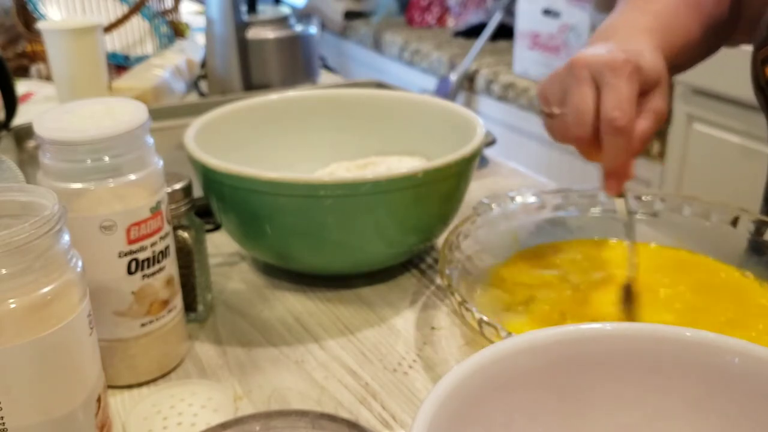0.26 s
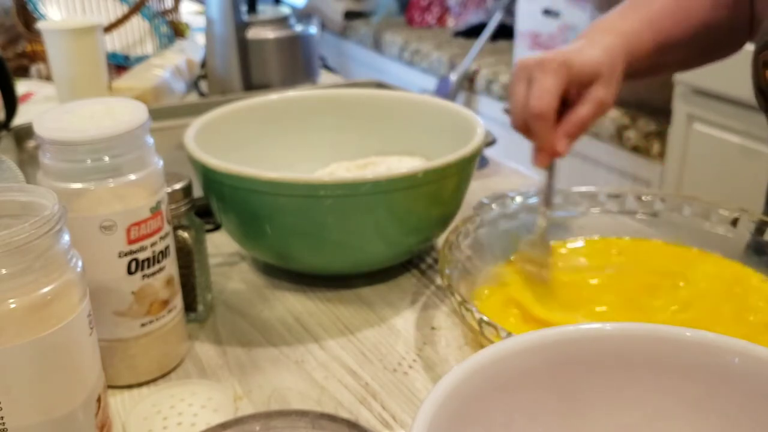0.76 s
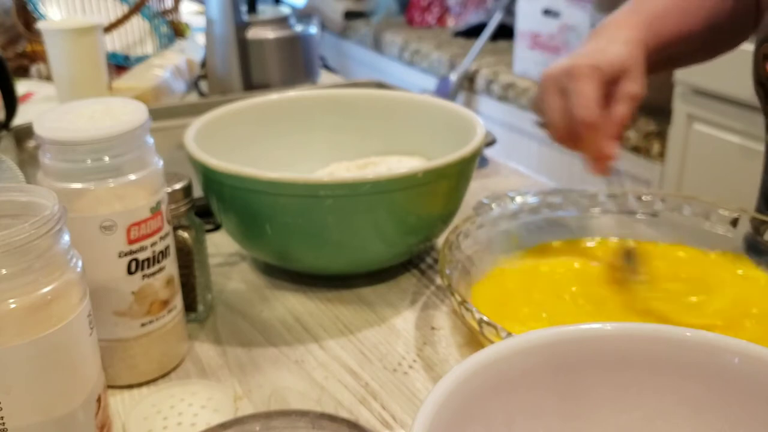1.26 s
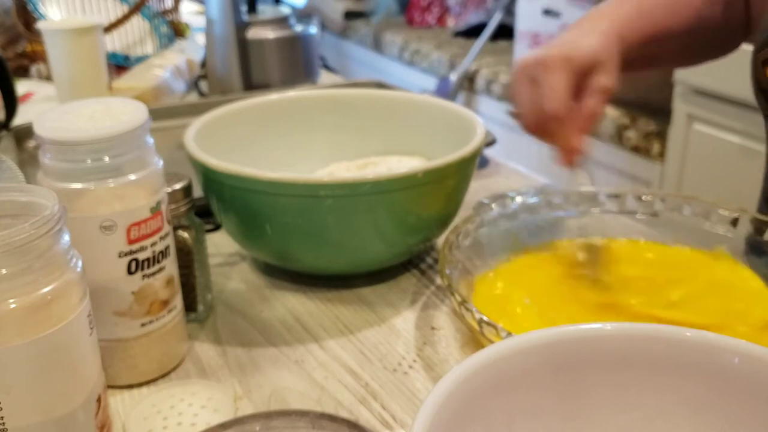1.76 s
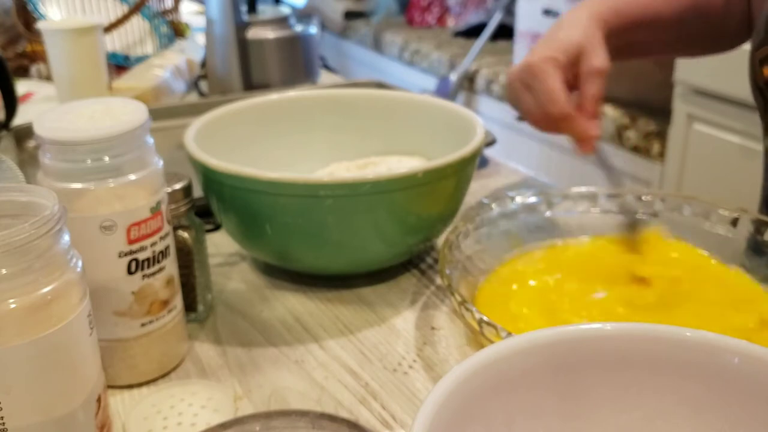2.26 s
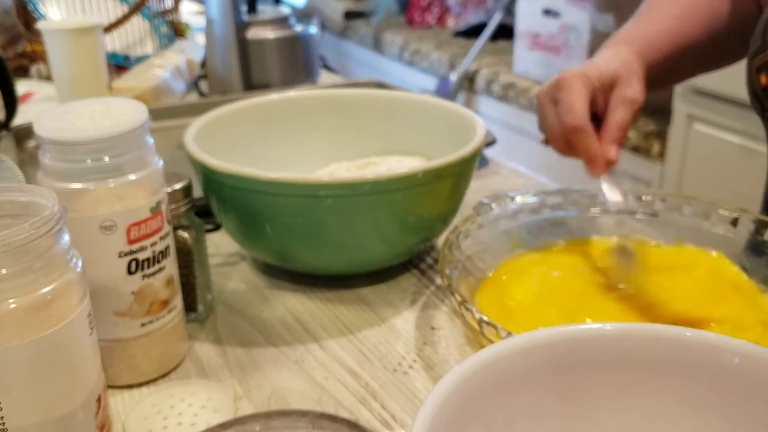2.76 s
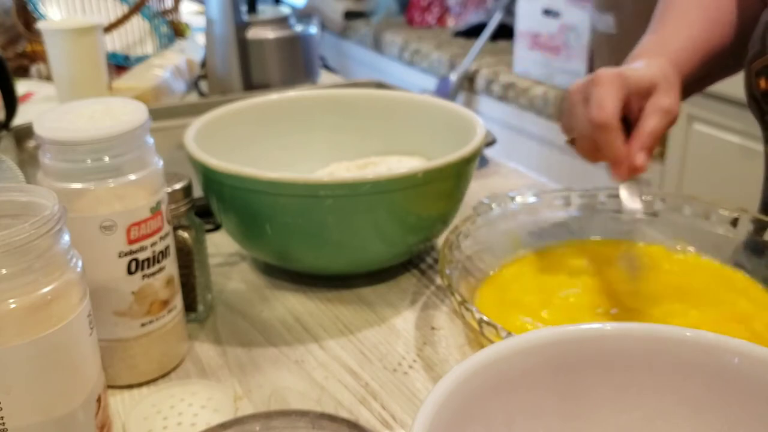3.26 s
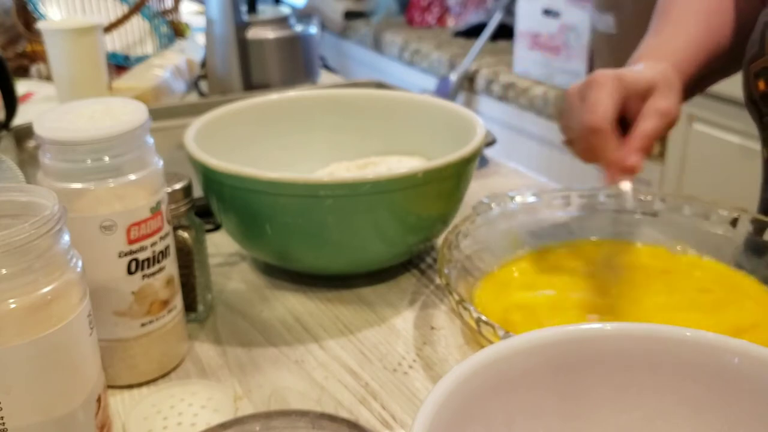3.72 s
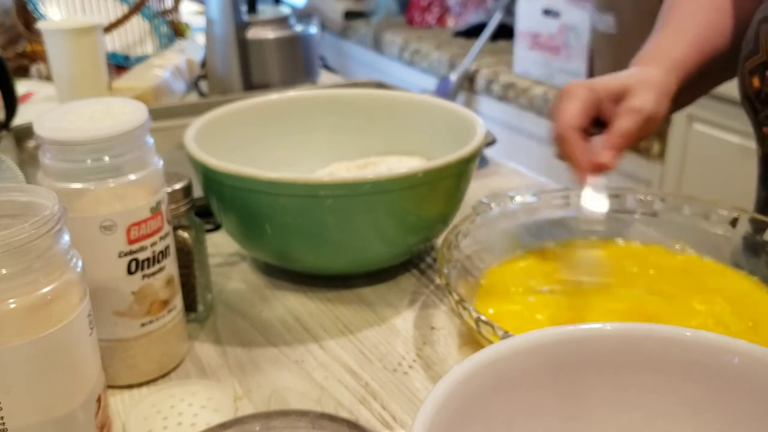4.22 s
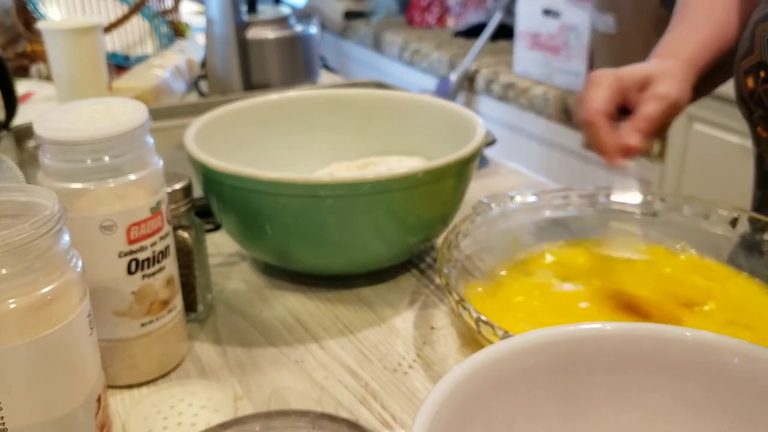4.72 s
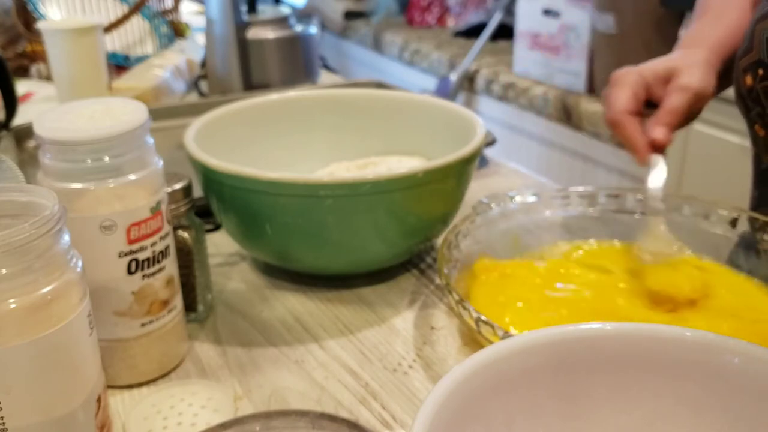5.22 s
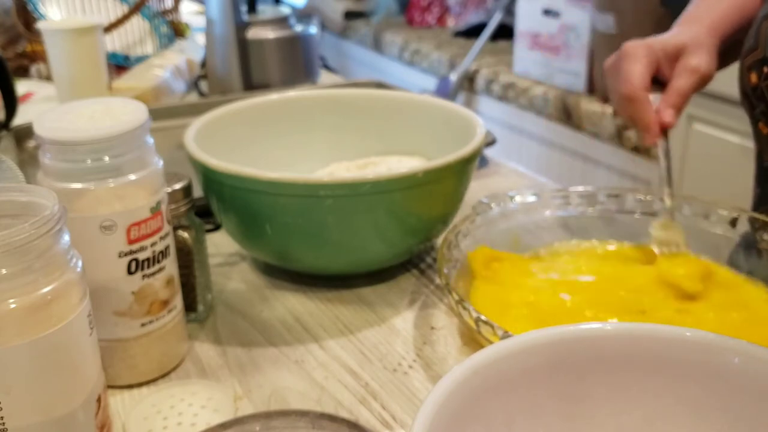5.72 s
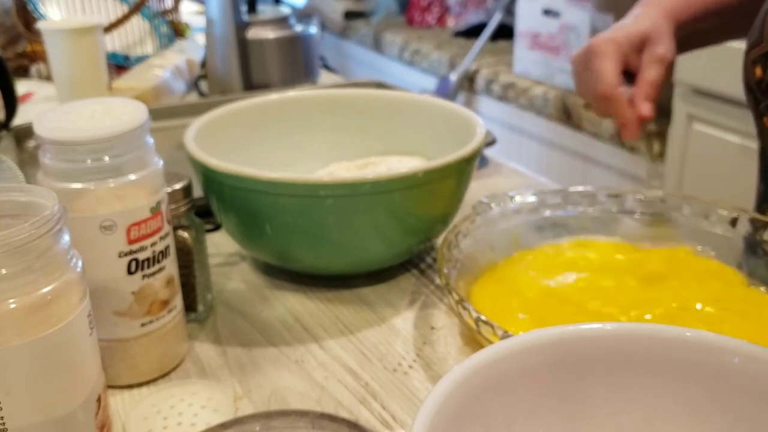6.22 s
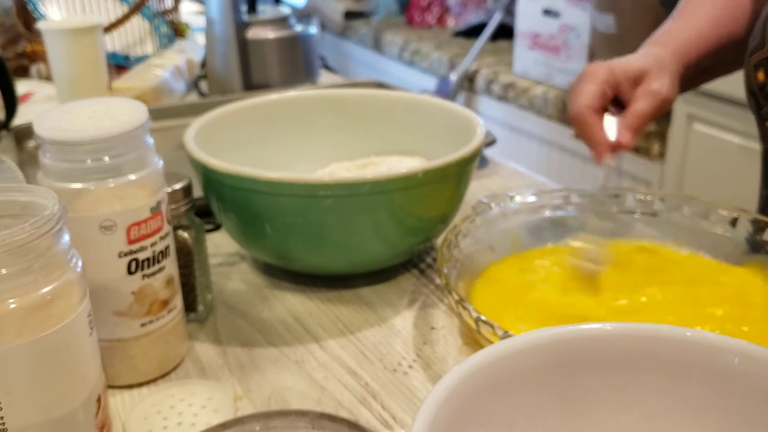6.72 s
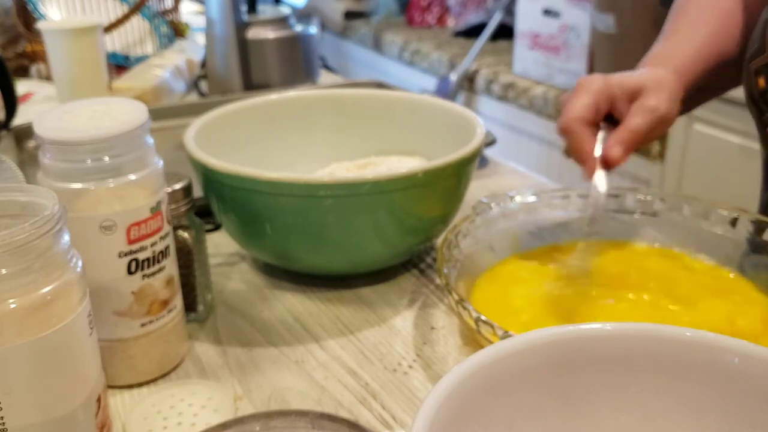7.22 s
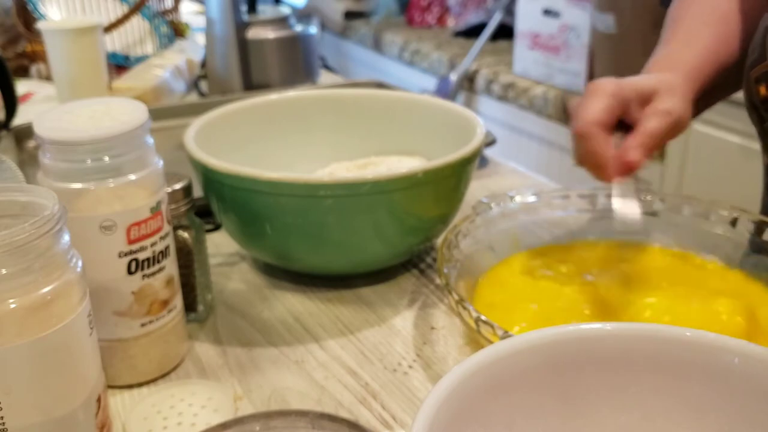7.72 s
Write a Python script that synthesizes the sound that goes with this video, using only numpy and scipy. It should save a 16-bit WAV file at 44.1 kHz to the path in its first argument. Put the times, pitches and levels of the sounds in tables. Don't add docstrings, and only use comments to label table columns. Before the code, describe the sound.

In a home kitchen, egg is stirred softly, then whisked briskly, fork tines clicking on glass amid slops and ringing rim knocks.

```python
import sys
import numpy as np
from scipy import signal
from scipy.fft import rfft, irfft, next_fast_len
from scipy.io import wavfile
from scipy.ndimage import uniform_filter1d, map_coordinates

SR = 44100
rng = np.random.default_rng(int(sys.argv[2]) if len(sys.argv) > 2 else 0)


def gain_from_decibels(decibels):
    exponent = np.asarray(decibels, float) / 20
    return 10 ** exponent


def unload_audio(sound):
    columns = np.transpose(np.atleast_2d(sound))
    steps = np.round(np.clip(columns, -1, 1) * 32767)
    wavfile.write(sys.argv[1], SR, steps.astype(np.int16))


N = 351918


def unit(x):
    return x / np.sqrt(np.mean(x ** 2) + 1e-20)


def along(points, hz):
    f, v = np.transpose(points)
    return np.interp(np.log(hz + 1), np.log(f + 1), v)


def filtered(x, response):
    m = next_fast_len(N + SR // 2)
    spectrum = rfft(x, m) * response(np.fft.rfftfreq(m, 1 / SR))
    return irfft(spectrum, m)[..., :N]


def body(modes):
    def response(f):
        total = 0
        for k, (centre, width, db) in enumerate(modes):
            resonance = 1j * f * width / (centre * centre - f * f + 1j * f * width)
            total = total + (-1) ** k * gain_from_decibels(db) * resonance
        return total
    return response


def add(track, s, sound):
    part = track[..., max(round(s * SR), 0):][..., :sound.shape[-1]]
    part += sound[..., :part.shape[-1]]


def wobble(rate_hz):
    knots = rng.standard_normal(int(N * rate_hz / SR) + 4)
    return map_coordinates(knots, [np.arange(N) * rate_hz / SR])


def grit(count, spiky):
    size = np.exp(spiky * uniform_filter1d(rng.standard_normal(count), size=9))
    return unit(rng.standard_normal(count) * size)


def chatter(force, spiky):
    burst = force * grit(len(force), spiky)
    return burst * np.linalg.norm(force) / np.linalg.norm(burst)


def patchy(x, patchy_db):
    z = signal.stft(x, nperseg=512)[2]
    field = uniform_filter1d(rng.standard_normal(z.shape), size=7, axis=0)
    field = uniform_filter1d(field, size=6, axis=1)
    return signal.istft(z * gain_from_decibels(patchy_db * unit(field)), nperseg=512)[1][:N]


# t/s, click level/dB, sparkle over click/dB, spot f/Hz
BEATS = [(2.642, -30.5, 0.5, 7280), (2.821, -27.5, -3.5, 2025), (2.9886, -23.5, -1.5, 2130),
         (3.1597, -24.5, 1.5, 1267), (3.3228, -21, -3.5, 2306), (3.4901, -22, 0.5, 4800),
         (3.6531, -22.5, 1, 3350), (3.8172, -30, -3, 2890), (3.9876, -25, -2.5, 3030),
         (4.158, -25.5, -3.5, 2110), (4.3332, -33.5, -3.5, 7730), (4.5114, -37, -1.5, 2690),
         (4.678, -24, 0, 1983), (4.8466, -28, 0, 1859), (5.017, -16.5, 0.5, 2153), (5.5442, -29, -4, 2180),
         (5.7112, -28.5, -5, 2446), (5.896, -35.5, 2, 2110), (6.068, -29.5, -6.5, 2050),
         (6.256, -29.5, -3.5, 1970), (6.4202, -31.5, 0.5, 2100), (6.6055, -32.5, -1.5, 2340),
         (6.79, -28, 0, 7440), (6.9632, -28, -0.5, 3440), (7.1334, -26, -2.5, 2844),
         (7.314, -29, -2.5, 2100), (7.483, -21.5, -1, 2165), (7.659, -15.5, -5.5, 2910),
         (7.83, -20, 0, 1920)]
BEAT_THUD_DB = [-13, -13, -13.5, -11.5, -14, -13, -11, -8.5, -10, -11.5, -12.5, -10, -10.5, -9, -11.5,
                -17.5, -15, -5.5, -15, -10.5, -12, -14.5, -12.5, -13, -12.5, -12, -13, -15, -10]
BOUNCE_DB = [0, -9.5, -16.5, -10, -6, -21, -13, -1, -13, -10, -24, -19, -7, -13, -11, -13, -18, -25.5, -16,
             -13.5, -16, -7, -6.5, -8.5, -9, -9, -15.5, -20, -19]
# t/s, click level/dB, thud level/dB, sparkle level/dB, spot f/Hz
STIRS = [(0.4253, -38, -44, -38, 4700), (0.5695, -55, -53.5, -46, 5640), (0.631, -52, -63, -49, 5530),
         (0.7917, -37, -44.5, -31.5, 2160), (0.852, -44, -62, -47, 2994), (1.3174, -40.5, -79, -77, 2950),
         (1.4035, -46.5, -61, -51.5, 1095), (1.5492, -68, -77.5, -58, 6140), (1.6304, -44, -80, -62, 1034),
         (1.6863, -51, -73, -66, 5850), (1.7872, -53, -70, -42, 6200), (1.8459, -44, -62, -53, 1980),
         (2.0031, -51, -53, -38.5, 6640), (2.0144, -35, -47, -36, 2100), (2.0725, -50, -58.5, -48, 6160),
         (2.14, -52, -77, -71, 2120), (2.2197, -37, -47, -33, 6280), (2.4354, -34, -45.5, -30.5, 2080)]
GRAZE_S = [2.8022, 3.079, 3.562, 3.6274, 3.8055, 4.3008, 4.3728, 4.456, 4.4878, 4.668, 4.8331, 4.8871, 5.01,
           5.163, 5.886, 6.058, 6.247, 6.395, 6.595, 6.717, 6.783, 6.9412, 7.299, 7.3075]
# click level/dB, thud level/dB, spot f/Hz
GRAZES = [(-47, -53, 6800), (-41, -72, 1500), (-37, -45, 4280), (-37.5, -43, 1200), (-35, -46, 1307),
          (-37, -68, 20000), (-42, -57, 2700), (-55, -72, 1180), (-41.5, -62, 1160), (-42.5, -56, 2100),
          (-38.5, -47.5, 1020), (-41, -69.5, 8000), (-35.5, -48.5, 4100), (-50, -70.5, 4500),
          (-48.5, -75, 1330), (-47, -73, 980), (-41, -74, 850), (-53, -69, 1360), (-36.5, -66, 1360),
          (-50.5, -81, 3570), (-39, -44.5, 1360), (-39, -60, 1377), (-53.5, -60, 1300), (-37, -41, 1700)]


def contacts():
    graze_sparkle_db = -9
    contact_ms, contact_scatter = 2.88, 0.31
    bounce_ms, bounce_scatter = 8, 0.3
    rows = []
    for (s, db, bright_db, hz), thud_db in zip(BEATS, BEAT_THUD_DB):
        rows.append((s, db, db + thud_db, db + bright_db, hz))
    rows += STIRS
    for s, (db, thud_db, hz) in zip(GRAZE_S, GRAZES):
        rows.append((s, db, thud_db, db + graze_sparkle_db, hz))
    draws = rng.standard_normal((len(rows), 4))
    late = []
    for (s, *levels, hz), (_, when, _, pitch), late_db in zip(rows, draws, BOUNCE_DB):
        late_s = s + bounce_ms / 1000 * np.exp(bounce_scatter * when)
        late.append((late_s, *(np.array(levels) + late_db), hz * np.exp(0.15 * pitch)))
    lengths_ms = contact_ms * np.exp(contact_scatter * np.tile(draws[:, 0], 2))
    return [(*row, ms) for row, ms in zip(rows + late, lengths_ms)]


def landings():
    glass, steel, push, spot = np.zeros((4, N))
    lead_s, thud_leads_s = 0.02, 0.00297
    spot_t60_s, spot_sag_per_s = 0.019, 3.7
    t = np.arange(SR // 14) / SR - lead_s
    after = np.abs(t) * (t >= 0)
    skid = gain_from_decibels(-5.5) * np.exp(np.minimum(t, 0) / 0.0033) * (t < 0)
    for s, click_db, thud_db, sparkle_db, spot_hz, ms in contacts():
        press = np.exp(-(after / (max(ms, 0.3) / 1000)) ** 4)
        linger = gain_from_decibels(-9.0) * np.exp(-after / 0.019)
        force = skid + (t >= 0) * (press + linger)
        add(glass, s - lead_s, gain_from_decibels(click_db + 2.5) * chatter(force, spiky=1.42))
        add(steel, s - lead_s, gain_from_decibels(sparkle_db + 12.5) * chatter(force ** 1.46, spiky=2.66))
        fade = gain_from_decibels(click_db + 2.5 - 60 * after / spot_t60_s) * (1 - np.exp(-after / 0.00052))
        tone = np.sin(2 * np.pi * spot_hz * after * (1 - spot_sag_per_s * after))
        add(spot, s - lead_s, fade * tone)
        add(push, s - thud_leads_s, gain_from_decibels(thud_db + 19.5) * np.hanning(SR // 900))
    return glass, steel, push, spot


# middle t/s, length/ms, steel level/dB, squeal f/Hz
SLIDES = [(0.5, 66, -56, 6030), (0.574, 65, -47, 5860), (0.899, 85, -48.5, 6160), (1.149, 78, -50, 5900),
          (1.329, 47, -55.5, 6940), (1.40, 84, -49.5, 6250), (1.56, 33, -58, 6200),
          (1.644, 76, -51.5, 5820), (1.69, 37, -53.5, 6050), (1.799, 91, -56, 6900),
          (1.874, 53, -43.5, 6500), (2.007, 21, -47.5, 6800), (2.076, 64.6, -52, 6200),
          (2.432, 21, -40, 7540), (3.479, 10, -43, 7300), (3.561, 45, -45.5, 4300), (4.195, 29, -44, 6100),
          (5.353, 4.8, -24, 6900), (7.822, 14, -40, 6100)]


def slides():
    slide, squeal, glass = np.zeros((3, N))
    run_in_s, run_in_ms, run_in_db = 0.017, 32, -37.5
    squeal_db, squeal_width_hz, glass_db = 1.5, 250, -5.5
    run_ins = [(s - run_in_s, run_in_ms, db + run_in_db, hz) for s, db, _, hz in BEATS]
    for s, ms, steel_db, hz in SLIDES + run_ins:
        swell = np.hanning(round(1.3 * max(ms, 5) * SR / 1000))
        count = len(swell)
        start = s - count / SR / 2
        add(slide, start, gain_from_decibels(steel_db + 6.5) * swell * grit(count, spiky=0.73))
        smooth = max(round(SR / squeal_width_hz), 2)
        waver = unit(uniform_filter1d(rng.standard_normal(count), smooth))
        tone = waver * np.sin(2 * np.pi * hz * np.arange(count) / SR)
        add(squeal, start, gain_from_decibels(steel_db + squeal_db - 6.5) * swell * tone)
        add(glass, start, gain_from_decibels(steel_db + glass_db + 9.5) * swell * grit(count, spiky=0.295))
    return slide, squeal, glass


# f/Hz, width/Hz, level/dB
BOTTOM = [(834, 25, -6), (939, 52, -6.5), (1269, 190, -1), (1970, 160, 0.5), (2192, 292, 1.5),
          (2844, 384, 0.5), (3350, 560, -5), (4880, 800, -1.5), (5590, 960, -1), (6930, 510, -10)]
TINES = [(6470, 3700, -11.5), (11000, 1500, -2.5), (12170, 430, 2), (13800, 1240, -6.5)]
SLIDING = [(4320, 2000, -8.5), (6250, 310, -7.5), (7300, 410, -4.5), (10560, 420, 0), (11800, 830, -1),
           (13800, 1800, -5)]
LOW_SONG = [(1187, 24, 0), (1224, 14.6, 7)]
HIGH_SONG = [(2038, 14.7, -3), (2130, 59, -3)]
COUNTER = [(86.5, 8.8, -2.5), (136, 37, -9.5), (199.2, 19.5, 0), (266.1, 21, 2.5), (363, 110, -7.5),
           (420, 23.7, 1.5), (628, 96, -14)]
MIDDLE = [(110.7, 26, -0.5), (174.8, 15.8, 7), (208.5, 14, 8), (304.6, 29, -2.5), (382.6, 47.5, -2.5)]
DEEP = [(63.6, 12, -12), (85, 53, -4.5), (117.6, 5.1, 0)]
# t/s, 0 middle to 1 edge, floor freedom to sing/dB
PLACE = [(0, 0.12, 2), (.7, 0.13, -5.5), (1.3, 0.14, -6), (1.9, .12, 0.5), (2.5, 0.13, -2),
         (2.9, 0.92, -2.5), (3.8, 1, -2.5), (5, 1, -8.5), (5.6, 0.27, -17), (6.5, 0.16, -13),
         (6.9, 0.85, -12), (7.9, 1, -0.5)]


def taps():
    glass, steel, push, spot = landings()
    slide, squeal, rubbed_glass = slides()
    glass = glass + rubbed_glass
    s, *place = np.transpose(PLACE)
    edge, low_db = [np.interp(np.arange(N) / SR, s, p) for p in place]
    high_db = -5 * edge
    song = filtered(gain_from_decibels(low_db + 9.5) * glass, body(LOW_SONG))
    song += filtered(gain_from_decibels(high_db + 13.5) * glass, body(HIGH_SONG))
    turn = np.pi / 2 * np.clip(edge, 0, 1)
    thud = filtered(np.sin(turn) * push, body(COUNTER)) + filtered(np.cos(turn) * push, body(MIDDLE))
    thud += gain_from_decibels(-9.5) * filtered(uniform_filter1d(push, size=150), body(DEEP))
    rub = patchy(filtered(slide, body(SLIDING)), patchy_db=2.5)
    click = patchy(filtered(glass, body(BOTTOM)) + filtered(steel, body(TINES)), patchy_db=2.5)
    return spot + squeal + song + thud + rub + click


# t/s, peak level/dB, thud level/dB, cabinet knock level/dB, sparkle level/dB
RIM = [
    (2.3032, -7.5, -37.5, -52, -17.5),
    (2.5075, -11, -35, -55, -23),
    (5.192, -8, -38.5, -37.5, -24.5),
    (5.3538, -10.5, -42, -44, -16.5),
    (5.3625, -13.9, -58.5, -62, -22),
]
RATTLE_MS = [3.7, 3.2, 1.5, 18, 20]
RING_HZ = [580, 625, 1252, 1318, 2080, 3011, 3080, 4109, 4260, 5351, 5631, 6782, 7190, 8410, 10570, 12175,
           14475]
# t60/s, level at each of the five blows/dB
RING = [(0.052, -28.5, -23, -16.5, -27, -33.5), (0.15, -16, -16.5, -17.5, -21.5, -33.5),
        (0.19, -14.5, -12, -22, -17, -12.5), (0.12, -16, -21, -19, -18.5, -7),
        (0.16, -3, -3.5, -9, -17, -2), (0.11, -9, -7.5, -10.5, -16, -8.5), (0.072, -41, -19.5, -5, -12, -1),
        (0.049, -20.5, -7.5, -9.5, -6.5, -28), (0.1, -9, -7, -5, -16, -24),
        (0.14, -11.5, -9.5, -14, -4.5, -16.5), (0.073, -8.5, -11, -17, -9.5, -29.5),
        (0.04, -2, -2, -6, -13, -21.5), (0.045, -19, -22, -15.5, -9, -25),
        (.06, -37, -36, -37.5, -27.5, -22), (0.1, -30, -26, -10, -28, -19.5),
        (0.08, -23, -17, -29, -28, -13.5), (0.12, -14, -15, -15, -24, -13)]


def rim():
    ring, glass, steel, push, knock = np.zeros((5, N))
    t = np.arange(SR // 2) / SR
    late_db, late_cycles = -21, 2100
    attack = 1 - np.exp(-t / 0.00023)
    for blow, ((s, db, thud_db, deep_db, sparkle_db), ms) in enumerate(zip(RIM, RATTLE_MS)):
        free = np.maximum(t - ms / 1000, 0)
        for hz, (t60, *levels) in zip(RING_HZ, RING):
            fade = gain_from_decibels(-60 * free / t60) + gain_from_decibels(late_db - 60 * t * (hz + 1100) / late_cycles / 0.82)
            add(ring, s, gain_from_decibels(db - 4.5 + levels[blow]) * fade * attack * np.sin(2 * np.pi * hz * t))
        add(glass, s, chatter(gain_from_decibels(db + 4.5 - 60 * t / 0.03), spiky=0.64))
        add(steel, s, gain_from_decibels(sparkle_db + 13.5 - 60 * t / 0.052) * grit(len(t), spiky=0.96))
        add(glass, s, gain_from_decibels(db + 5) * np.hanning(SR // 8000))
        add(push, s, gain_from_decibels(thud_db + 23.0) * np.hanning(SR // 1100))
        add(knock, s, gain_from_decibels(deep_db + 25.5) * np.hanning(SR // 300))
    blows = filtered(glass, body(BOTTOM)) + filtered(steel, body(TINES))
    blows += filtered(push, body(COUNTER)) + filtered(knock, body(DEEP))
    return ring, blows


def bubble(hz, cycles, count):
    u = np.arange(count) / SR * hz
    fade = gain_from_decibels(-30 * u / cycles) * (1 - np.exp(-u / 1.22))
    return fade * np.sin(2 * np.pi * u * (1 + 0.068 * u / cycles))


def froth(count=1600):
    when, pitch, size = rng.random(count), rng.standard_normal(count), rng.exponential(size=count)
    hz = 1400 * np.exp(0.42 * pitch)
    rows = gain_from_decibels(2.6 * np.minimum(size, 3))[:, None] * bubble(hz[:, None], 2.4, count=700)
    where = (when * N).astype(int)[:, None] + np.arange(rows.shape[1])
    return unit(np.bincount(where.ravel(), rows.ravel(), minlength=N)[:N])


# t/s, pressure level/dB, slop over drag/dB
HAND = [(0, -50.5, -34), (.25, -78, -45), (.5, -79, -18), (.7, -71, -18), (.95, -60.5, 0.5),
        (1.3, -69.5, -10), (1.55, -79, 4), (1.85, -59.5, -6), (2.15, -65.5, -8), (2.8, -64, 4),
        (3.5, -58.5, -18), (4.1, -62.5, 4.5), (4.7, -78, 22), (5.2, -52, -3), (5.8, -73, 6),
        (6.7, -78.5, 7.5), (7.3, -65.5, 1), (7.98, -60.5, 11.5)]
# f/Hz, density/dB per Hz
SLOP = [(300, 0), (700, 13.5), (1200, 3.5), (1600, 7.5), (2100, 8), (3200, -36), (5000, -43), (8000, -51.5)]
# t/s, peak level/dB, f/Hz
BUBBLES = [(0.933, -34, 1720), (1.1, -37, 1450), (1.405, -30, 1060), (2.141, -34.5, 1830),
           (2.721, -30, 553), (2.804, -32.5, 800), (3.022, -33, 3050), (4.019, -36, 900),
           (4.042, -40, 1250), (4.103, -30.5, 810), (4.119, -38, 540), (4.262, -32, 2660),
           (4.315, -33.5, 750), (4.368, -36.5, 892), (4.384, -28, 2200), (4.458, -34, 1150),
           (4.469, -40, 1220), (4.496, -31, 726), (4.6, -31, 1310), (5.03, -34.5, 560), (5.445, -31.5, 800),
           (5.612, -34, 910), (6.3, -42.5, 630), (6.59, -37, 1290), (6.945, -41, 1010), (6.975, -34, 1250),
           (7.105, -44.5, 690), (7.12, -35, 1250), (7.243, -45, 2200), (7.296, -36, 1250),
           (7.599, -42, 566)]


def egg():
    shake_db, shake_t60_s, earlier_blow_db = -28.5, 0.52, -35.5
    rumble_db, rumble_follows = -65.5, 0.6
    life_cycles, life_grows_per_s = 3.6, 1
    s, *hand = np.transpose(HAND)
    t = np.arange(N) / SR
    press_db, depth_db = [np.interp(t, s, db) for db in hand]
    shaken = np.zeros(N)
    for s, db, *_ in RIM + [(0, earlier_blow_db)]:
        shaken += gain_from_decibels(db + shake_db - 60 * np.abs(t - s) / shake_t60_s) * (t >= s)
    drag = gain_from_decibels(press_db + 1.26 * wobble(7.4)) + gain_from_decibels(-3.5) * shaken
    slop = gain_from_decibels(press_db + depth_db + 1.2 * wobble(11))
    rumble = gain_from_decibels(rumble_db + rumble_follows * (press_db - press_db.mean()) + 1.1 * wobble(3.6))

    rub = grit(N, spiky=0.77)
    scrape = filtered(rub, body(TINES)) + gain_from_decibels(3.5) * filtered(rub, body(BOTTOM)) + gain_from_decibels(-16) * rub
    swash = unit(filtered(grit(N, spiky=0.34), lambda hz: gain_from_decibels(along(SLOP, hz))))
    wet = drag * patchy(unit(scrape), patchy_db=2.5)
    wet += (gain_from_decibels(-10.0) * slop + gain_from_decibels(-5.0) * shaken) * patchy(swash, patchy_db=1.5)
    wet += gain_from_decibels(-6.5) * slop * froth()
    wet += gain_from_decibels(-3.0) * rumble * unit(filtered(rng.standard_normal(N), body(MIDDLE)))
    for s, db, hz in BUBBLES:
        add(wet, s, gain_from_decibels(db) * bubble(hz, life_cycles + life_grows_per_s * s, count=SR // 20))
    return wet


def splash(count=6):
    level_db, fade_db, from_s, span_s = -7.5, 22.5, -0.0069, 0.11
    wet = np.zeros(N)
    for (s, db, *_), draws in zip(BEATS, rng.random((len(BEATS), count, 3))):
        for late, pitch, size in draws:
            plop = bubble(900 * np.exp(1.3 * (pitch - 0.5)), 7.1, count=SR // 30)
            plop_db = db + level_db - fade_db * late - 4.3 * size
            add(wet, s + from_s + span_s * late, gain_from_decibels(plop_db) * plop)
    return wet


def nearby(x, count=10):
    path = np.zeros((2, SR // 40))
    delay = (rng.random((2, count)) ** 1.5 * 0.018 * SR).astype(int) + SR // 2000
    echo = rng.standard_normal((2, count)) * gain_from_decibels(-60 * delay / SR / 0.054)
    np.put_along_axis(path, delay, echo, axis=1)
    path = path / np.linalg.norm(path, axis=1)[:, None]
    far = lambda hz: 1 - 1 / (1 + (hz / 600) ** 2)
    return filtered(signal.oaconvolve(x[None], path, axes=1)[:, :N], far)


# f/Hz, t60/s
KITCHEN = [(100, 0.14), (500, 0.49), (1500, 0.51), (4000, 0.55), (8000, 0.41), (16000, 0.25)]


def kitchen(x, count=3):
    which = (np.arange(N) // (SR // 6)) % count
    wet = 0
    for k in range(count):
        hz, t, z = signal.stft(rng.standard_normal((2, SR // 2)), SR, nperseg=256)
        alike = 1 / (1 + (hz[:, None] / 320) ** 2)
        z[1] = alike * z[0] + np.sqrt(1 - alike ** 2) * z[1]
        fade = gain_from_decibels(-60 * t / along(KITCHEN, hz)[:, None])
        tail = signal.istft(z * fade, SR, nperseg=256)[1]
        tail = tail / np.linalg.norm(tail[0])
        wet = wet + signal.oaconvolve((x * (which == k))[None], tail, axes=1)
    return np.pad(wet, ((0, 0), (SR // 250, 0)))[:, :N]


# f/Hz, density/dB per Hz
HUSH = [(20, -33), (60, 0), (130, -2.5), (250, -13.5), (500, -22.5), (1500, -42), (3500, -27.5),
        (6500, -20.5), (9300, -28), (12000, -25.5), (15700, -25.5), (16700, -56)]
# f/Hz, left-right likeness
ALIKE = [(30, 0.53), (100, 1), (400, 0.73), (1000, 0.26), (15000, .1)]


def hush():
    def spread(hz):
        turn = np.arccos(np.clip(along(ALIKE, hz), -1, 1)) / 2
        return gain_from_decibels(along(HUSH, hz)) * [np.cos(turn), np.sin(turn)]
    mid, side = filtered(rng.standard_normal((2, N)), spread)
    return gain_from_decibels(-64.5) * unit(np.array([mid + side, mid - side]))


# f/Hz, left over right/dB
PORT_LEVEL = [(60, 0), (800, -0.5), (2000, 1), (4000, -0.5), (7000, 1.5), (10000, -8.5), (15000, -7)]
# f/Hz, left phase lead/rad
PORT_TURN = [(60, -0.1), (300, 0.44), (690, 0.5), (1200, -2), (2070, -1.5), (2930, -1.4), (4480, 1),
             (5250, -4.5), (7100, -5), (9300, -4), (12900, -8), (15000, -7.5)]
# f/Hz, gain/dB
PORT_COLOUR = [(20, 2), (7000, 1), (7900, -3.5), (8800, -6.5), (9800, -8), (10500, -9), (15900, -3),
               (16900, -20.5)]


def scene():
    ring, blows = rim()
    dish = taps() + blows + egg() + splash()

    def ports(hz):
        level = gain_from_decibels(np.outer([0.5, -0.5], along(PORT_LEVEL, hz)))
        return level * np.exp(np.outer([0.5j, -0.5j], along(PORT_TURN, hz)))
    near = filtered(dish + ring, ports)
    near = near + nearby(gain_from_decibels(-4.5) * dish + gain_from_decibels(-14.5) * ring)
    near = near + kitchen(gain_from_decibels(-9.0) * dish + gain_from_decibels(-10.5) * ring)
    return filtered(near, lambda hz: gain_from_decibels(along(PORT_COLOUR, hz))) + hush()


def low_pass(x):
    return signal.sosfilt(signal.butter(12, 16960, fs=SR, output="sos"), x)


def record(dry):
    top = 0.93
    mix = dry / (1 + np.abs(dry / top) ** 4) ** (1 / 4)
    return low_pass(mix)


dry = scene()
out = record(dry)
unload_audio(out)
```